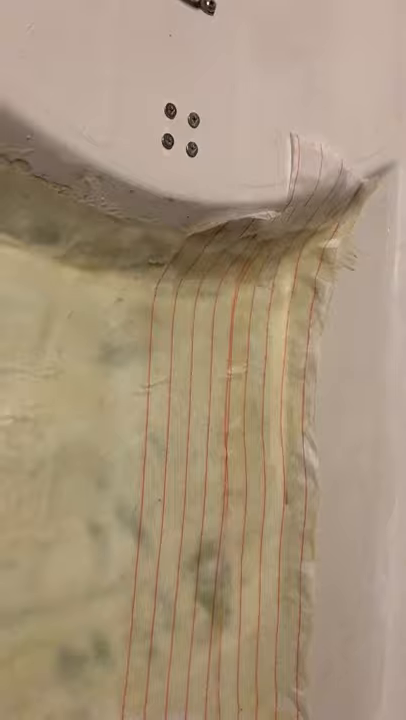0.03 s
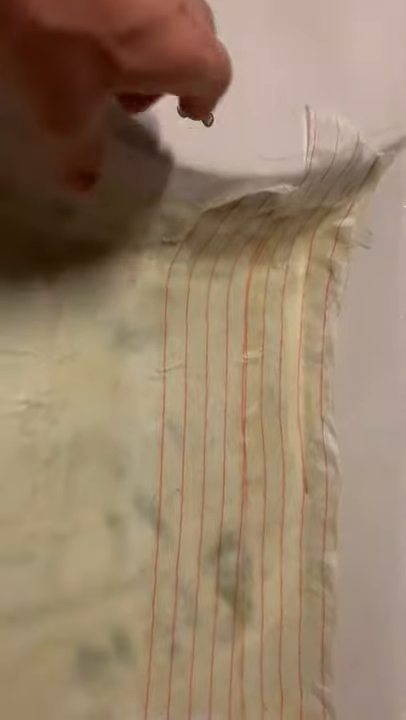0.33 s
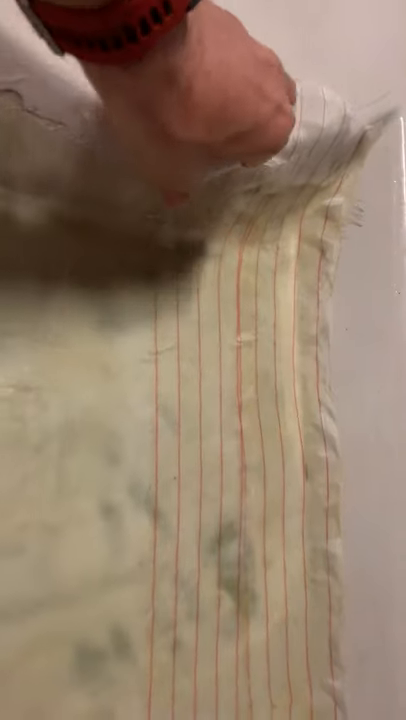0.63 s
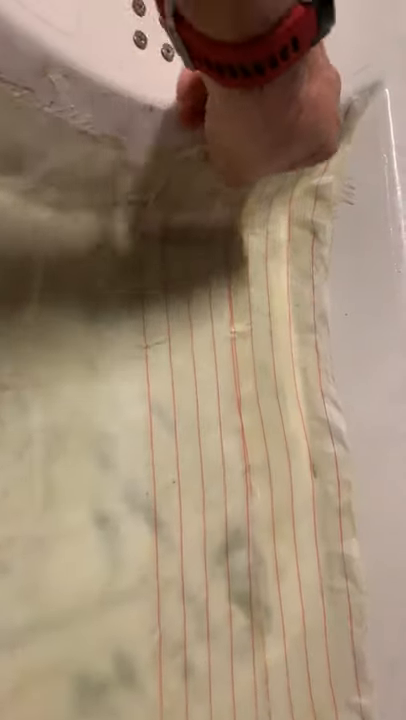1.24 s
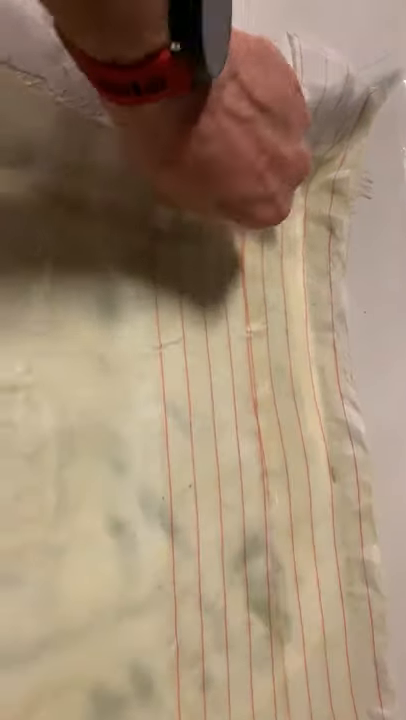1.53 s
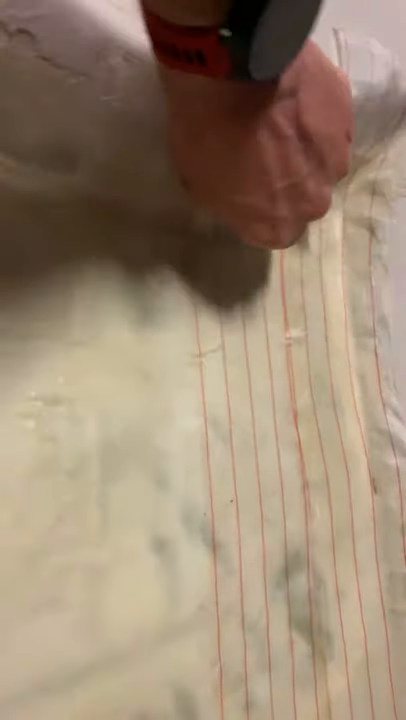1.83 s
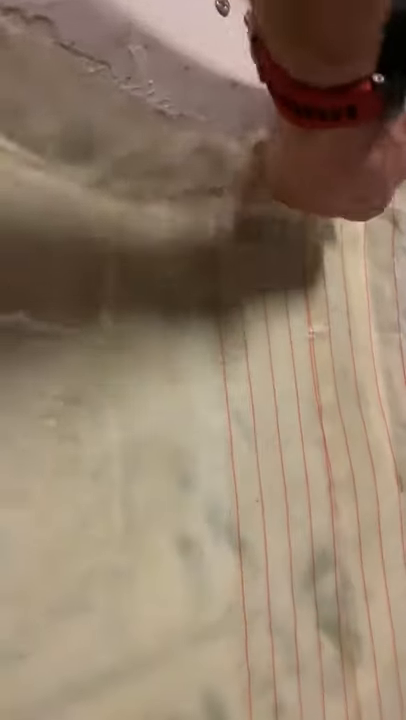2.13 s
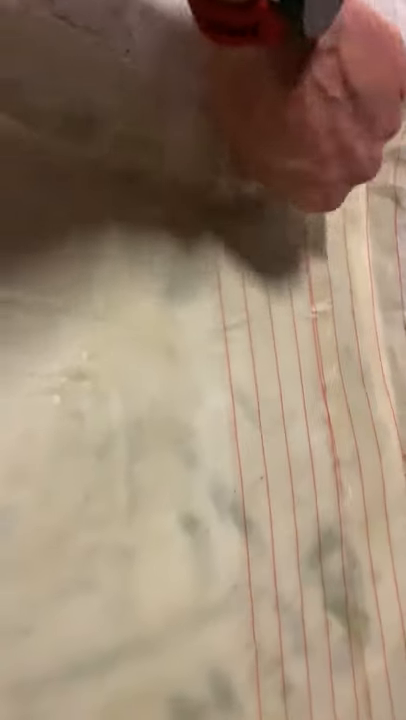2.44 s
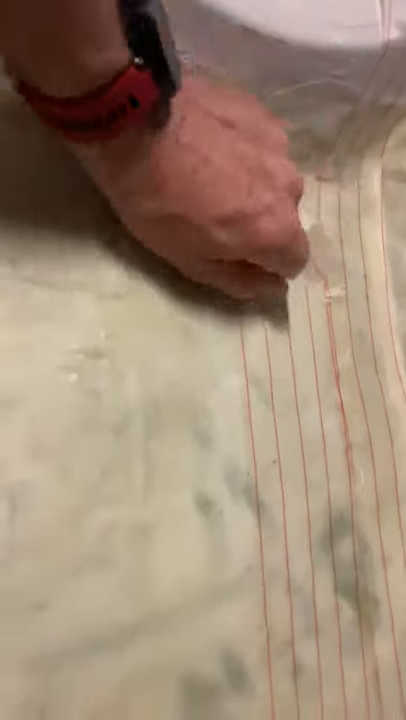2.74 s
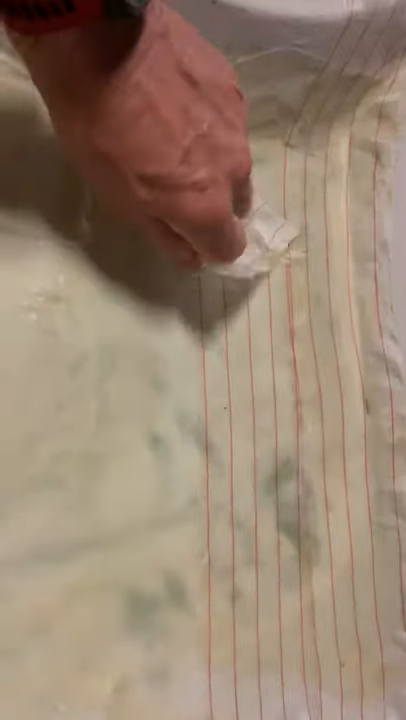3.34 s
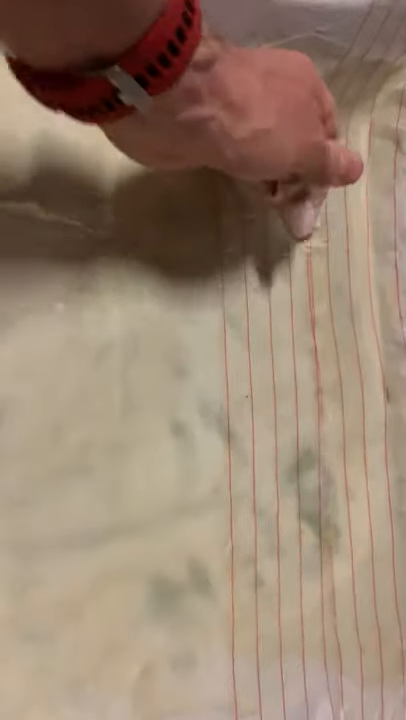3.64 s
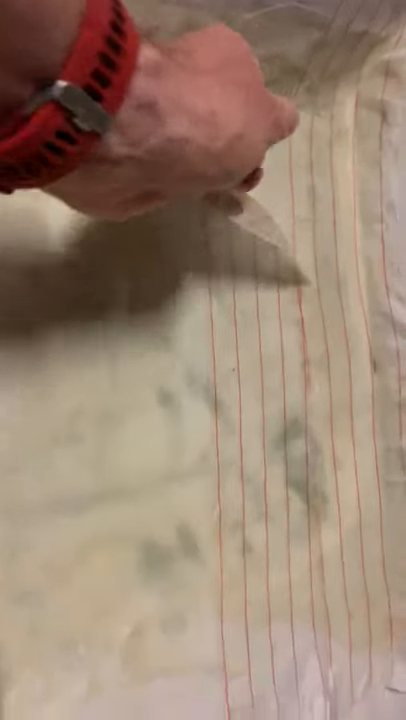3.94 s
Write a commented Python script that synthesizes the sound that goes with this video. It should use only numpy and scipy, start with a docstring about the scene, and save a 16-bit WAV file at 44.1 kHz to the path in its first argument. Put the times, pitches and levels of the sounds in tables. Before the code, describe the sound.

Dry cloth is torn off a hard resin panel by hand. Faint rustles grow into uneven, crackling rips and sharp snaps, with one low boom from the hull, heard close up in a boat cockpit.

```python
"""You hear faint rustles, then dry, crackling rips, sharp snaps and one low boom.
A hand is tearing peel ply (a strip of cloth) off a hardened resin panel in a boat cockpit.
Each pull breaks thousands of tiny resin bonds a second, so the cloth hisses and the panel rasps.
Bigger bonds snap one by one, the hull rumbles and booms, and the close walls add a short echo."""
import sys
import numpy as np
from scipy import signal
from scipy.fft import rfft, irfft
from scipy.io import wavfile
from scipy.ndimage import uniform_filter1d

SR = 44100
rng = np.random.default_rng(int(sys.argv[2]) if len(sys.argv) > 2 else 0)


def wav_record(signal):
    """Record a signal, one row per channel, as 16-bit PCM in the file named by sys.argv[1]."""
    frames = np.transpose(np.atleast_2d(signal))
    bounded = np.clip(frames, -1, 1)
    # unit amplitude maps onto the largest positive 16-bit level
    quanta = np.round(bounded * 32767).astype(np.int16)
    wavfile.write(sys.argv[1], SR, quanta)


N = 176400

# Levels in the tables are relative: the functions apply further gains.
# Tone of the still air and of the hull: frequency_hz, level_db
AIR_TONE = [(60, -19), (15000, -16)]
HULL_TONE = [(15, -15), (45, 0), (68, 1.5), (85, -3.5), (190, -9.5), (300, -15.5), (2000, -52)]
# The hull's rumble under the hand: time_s, level_db
RUMBLE_LEVELS = [(.09, -95), (.125, -64), (.5, -67), (.72, -49), (.86, -54), (1.02, -39.5), (1.24, -60),
                 (1.63, -30), (1.83, -44), (2.43, -44), (2.50, -22.5), (2.65, -33.5), (2.72, -16.5),
                 (2.83, -37), (3.2, -35.5), (3.6, -52.5), (3.72, -45), (4.0, -33.5)]
# Notes in the hull's boom: pitch_hz, level_db, fade_s (time to fall 60 dB)
BOOM_NOTES = [(63.9, 3, 0.44), (46.9, -7, 1), (199, -11.5, 0.064)]
# How long the cockpit echoes: frequency_hz, fade_s
ECHO_FADES = [(150, 0.38), (1000, 0.24), (15000, 0.21)]
# How far the left side is ahead of the right: frequency_hz, lead_radians
LEFT_LEAD = [(520, -.6), (900, .6), (3880, 1.7), (5300, 3.14), (8000, 6.2), (11200, 9.25), (12000, 9.6),
             (14300, 12.3)]
# Balance between the sides: frequency_hz, left_minus_right_db
LEFT_BALANCE = [(450, -2.5), (740, -6), (1220, -1), (5500, 0.5)]
# Tone of the cloth, the panel's corner and its flat part: frequency_hz, level_db
CLOTH_TONE = [(500, -25.5), (1500, -37), (2400, -7), (4800, 2.5), (6500, 6), (8500, 2.5), (14000, -2.5)]
CORNER_TONE = [(80, -36.5), (200, -2), (600, -2), (1600, -1), (3200, -11.5), (5000, -19.5), (12000, -56)]
FLAT_TONE = [(80, -35), (200, -1.5), (1000, 2.5), (1600, -1), (3200, -9), (5000, -17), (12000, -69)]
# Notes at which the panel rings: pitch_hz
PANEL_NOTES = [330, 405, 560, 955, 1185, 1580, 1800, 3150]
# Stiff flaps of cloth hitting the panel: start_s, pitch_hz, level_db
FLAP_HITS = [(.158, 1280, -55), (.984, 2200, -40.5), (.988, 930, -38), (1.665, 3230, -21),
             (3.077, 3230, -24.5), (3.652, 1014, -22), (3.7045, 1170, -22)]
# The fastest rip speeding up: time_s, pitch_hz, level_db
FAST_RIP = [(2.646, 1070, -17.5), (2.69, 1000, -22), (2.716, 1460, -31), (2.76, 1660, -13)]
# Single bonds letting go: start_s, crack_db, knock_db
BOND_SNAPS = [(1.35, -38.5, -44), (1.3614, -28.5, -36), (1.438, -23, -28.5), (1.445, -18, -22.5),
              (1.501, -26.5, -40), (1.5215, -24, -22.5), (1.5519, -18.5, -26.5), (1.5642, -13.5, -26),
              (1.5683, -18, -32), (1.5927, -23, -17), (1.6355, -16.5, -27), (1.6437, -19.5, -34),
              (1.6653, -30, -21.5), (1.687, -26.5, -21), (1.774, -25.5, -19.5), (2.387, -27, -20.5),
              (2.390, -16.5, -14.5), (2.4454, -14, -8), (2.4499, -17, -9), (2.457, -20, -17),
              (2.4627, -14.5, -6.5), (2.472, -13.5, -13), (2.4837, -15.5, -7.5), (2.506, -18.5, -33),
              (2.671, -29, -17), (2.7446, -36, -19.5), (2.7589, -13.5, -9), (2.7733, -21.5, -52),
              (3.036, -37, -18.5), (3.109, -25.5, -22), (3.183, -29.5, -9), (3.338, -32, -28),
              (3.4889, -35, -20.5), (3.5421, -27, -28), (3.645, -46, -20), (3.675, -26.5, -14.5),
              (3.784, -27, -34), (3.8402, -14, -45), (3.855, -25, -20), (3.8992, -15.5, -10),
              (3.98, -20, -14.5)]
# Loose cloth rustling in the hand: time_s, level_db
RUSTLE_LEVELS = [(.12, -85.5), (.62, -72.5), (1.26, -64.5), (1.72, -46.5), (1.89, -60.5), (2.1, -54),
                 (2.35, -53.5), (2.42, -46), (2.88, -46), (2.935, -59), (3.0, -52), (3.4, -50),
                 (3.61, -57.5)]
# Pulls, light and hard: start_s, end_s, hiss_start_db, hiss_end_db, rasp_start_db, rasp_end_db
HAND_PULLS = [(0.719, 0.874, -50, -62.5, -55, -63.5), (0.942, 0.991, -59, -44.5, -63.5, -44),
              (1.018, 1.09, -61, -79, -47.5, -72), (1.194, 1.223, -39, -58, -42.5, -64),
              (1.288, 1.426, -50, -56, -56, -54), (1.416, 1.59, -44, -35.5, -49.5, -33),
              (1.558, 1.693, -34, -44, -31.5, -38.5), (1.988, 2.069, -55.5, -40, -45.5, -45),
              (2.134, 2.192, -38.5, -34, -50, -45.5), (2.222, 2.329, -36.5, -49, -45, -47),
              (2.454, 2.493, -43, -21, -33, -20.5), (2.504, 2.646, -26.5, -30, -27, -27),
              (2.643, 2.653, -17.5, -16, -43, -40), (2.668, 2.706, -20, -26, -24.5, -22),
              (2.693, 2.755, -40, -23, -31, -29.5), (2.951, 3.106, -47, -49.5, -42.5, -42.5),
              (3.095, 3.151, -35.5, -23.5, -45.5, -22), (3.157, 3.173, -26.5, -25.5, -26, -21.5),
              (3.263, 3.333, -40.5, -38.5, -42.5, -36), (3.466, 3.499, -42.5, -35, -43.5, -33.5),
              (3.535, 3.579, -46, -44, -41.5, -58), (3.629, 3.679, -43, -34.5, -41.5, -25),
              (3.68, 3.756, -44, -41, -44, -38), (3.759, 3.884, -36.5, -32, -34.5, -28),
              (3.879, 3.998, -30.5, -43, -26.5, -35)]

NEW_GRIP_S = 2.9  # the peeling moves from the corner to the flat part
SNAP_DECAY_S = 0.0013
TIME_S = np.arange(N) / SR


def amp(db):
    """Turns decibels into a number to multiply by."""
    return 10 ** (np.asarray(db) / 20)


def evened(x):
    """Scales a sound to an average (rms) level of 1."""
    return x / np.sqrt(np.mean(x ** 2) + 1e-20)


def read(points, hz):
    """Looks up values between a table's rows, on a log-frequency scale."""
    row_hz, value = np.transpose(points)
    return np.interp(np.log(hz + 1), np.log(row_hz + 1), value)


def add(mix, start_s, sound):
    """Mixes a sound in at the given time."""
    part = mix[max(round(start_s * SR), 0):][:len(sound)]
    part += sound[:len(part)]


def colour(x, tone, size=4096):
    """Filters a sound to follow a tone table; white noise keeps its overall level."""
    log_gain = np.log(amp(read(tone, abs(np.fft.fftfreq(size, 1 / SR)))))
    response = np.exp(np.conj(signal.hilbert(log_gain)))  # rings after a hit, never before
    taps = np.fft.ifft(response).real[:size // 2]
    return signal.fftconvolve(x, taps / np.linalg.norm(taps))[:len(x)]


def resonate(x, hz, width_hz):
    """Makes a sound ring around a steady or moving pitch."""
    turn = np.exp(2j * np.pi * np.cumsum(hz * np.ones(len(x))) / SR)
    decay = np.exp(-np.pi * width_hz / SR)
    return 2 * (turn * signal.lfilter([1 - decay], [1, -decay], x / turn + 1e-18)).real


def air():
    """Still air: a very faint, steady hiss on each side."""
    return amp(-87) * np.array([evened(colour(noise, AIR_TONE)) for noise in rng.standard_normal((2, N))])


def hull(boom_s=2.68, rise_s=0.0041):
    """The hull rumbles as the hand tugs, and springs back with a boom when the strip gives way."""
    noise = evened(colour(rng.standard_normal(N), HULL_TONE, size=16384))
    out = amp(np.interp(TIME_S, *np.transpose(RUMBLE_LEVELS))) * noise
    boom = sum(amp(db - 60 * TIME_S / fade_s) * np.sin(2 * np.pi * hz * TIME_S)
               for hz, db, fade_s in BOOM_NOTES)
    add(out, boom_s, amp(-10) * np.minimum(TIME_S / rise_s, 1) * boom)
    return out


def cockpit_echo(x, gap_s=0.0027, spread=.66):
    """Sound bounces between hard, close walls and blurs into a short echo."""
    hz, t, spectrum = signal.stft(rng.standard_normal((3, SR)), SR, nperseg=256)
    fade = amp(-60 * t / read(ECHO_FADES, hz)[:, None])
    tail = signal.istft(spectrum * fade, SR, nperseg=256)[1]
    tail = (1 - spread) * tail[2] + spread * tail[:2]  # both sides share a part
    tail *= np.clip(np.arange(tail.shape[1]) / SR / gap_s - 1, 0, 1)  # a gap, then a fade in
    return signal.fftconvolve(x[None], tail / np.linalg.norm(tail[0]), axes=1)[:, :N]


def left_and_right(x, bass_hz=170, size=N + 4096):
    """The treble reaches the left side just before the right; the deep bass is not shifted."""
    hz = np.fft.rfftfreq(size, 1 / SR)
    apart = np.clip(hz / bass_hz - .5, 0, 1)
    left = amp(apart * read(LEFT_BALANCE, hz) / 2) * np.exp(.5j * apart * read(LEFT_LEAD, hz))
    return irfft(rfft(x, size) * np.array([left, 1 / left]), size)[:, :N]


def hand_cover(x, until_s=2.0, above_hz=10500, cover_db=-4.5):
    """At first the hand covers the tear and dulls the highest hiss."""
    dull = signal.sosfiltfilt(signal.butter(6, above_hz, fs=SR, output="sos"), x)
    return dull + (x - dull) * np.where(TIME_S < until_s, amp(cover_db), 1)


def panel(x, lag_s=0.001646):
    """The panel rings and bends. Low notes cross it more slowly, so each knock chirps downward."""
    ringing = x + amp(-7) * sum(resonate(x, hz, width_hz=81) for hz in PANEL_NOTES)
    size = len(x) + 8192
    hz = np.fft.rfftfreq(size, 1 / SR)
    lag_turns = 2000 * lag_s * np.sqrt(hz / 1000)
    head_start = np.exp(1j * np.pi * lag_s * hz)  # moves every note earlier by half of lag_s
    return irfft(rfft(ringing, size) * np.exp(-2j * np.pi * lag_turns) * head_start, size)[:len(x)]


def flaps(fade_s=0.029):
    """Stiff flaps of cloth flick the panel, each with a short, gritty ring."""
    t, out = np.arange(SR // 10) / SR, np.zeros(N)
    for start_s, hz, db in FLAP_HITS:
        grit = evened(resonate(rng.standard_normal(len(t)), hz, width_hz=hz))
        ring = np.sin(2 * np.pi * hz * t) + .5 * grit
        add(out, start_s, amp(db - 60 * t / fade_s) * ring)
    return out


def crackles(firm, per_s=190, lift=2.5):
    """Brief jumps in level where a firm pull tears out small bundles of threads."""
    starts = (rng.random(N) < per_s / SR) * rng.uniform(0.07, 1, N) * firm
    decay = np.exp(-1 / (2 * SNAP_DECAY_S * SR))
    return 1 + lift * signal.lfilter([1], [1, -decay], starts)


def fast_rip(width_hz=720):
    """Threads let go row by row like a zip: a rasp whose pitch rises with the speed."""
    times, hz, db = np.transpose(FAST_RIP)
    pitch = np.interp(TIME_S, times, hz)
    tearing = rng.standard_normal(N) * crackles(firm=True)
    note = resonate(resonate(tearing, pitch, width_hz), pitch, width_hz)
    level = np.interp(TIME_S, times, amp(db), left=0, right=0)
    return evened(note) * uniform_filter1d(level, size=128)


def snaps(rise_s=0.00015, thin_hz=815, size=1024):
    """A bundle of threads breaks free all at once: the cloth cracks and the panel knocks."""
    t = np.arange(size) / SR
    low_cut = signal.butter(2, thin_hz, "high", fs=SR, output="sos")
    cracks, knocks = np.zeros((2, N))
    for start_s, crack_db, knock_db in BOND_SNAPS:
        burst = rng.standard_normal(size) * (1 - np.exp(-t / rise_s)) * np.exp(-t / SNAP_DECAY_S)
        crack = colour(burst, CLOTH_TONE)
        if start_s < NEW_GRIP_S:  # the stiff corner carries few low notes
            knock = signal.sosfilt(low_cut, colour(burst, CORNER_TONE))
        else:
            knock = colour(burst, FLAT_TONE)
        add(cracks, start_s, amp(crack_db) * crack / np.linalg.norm(crack))
        add(knocks, start_s, amp(knock_db) * knock / np.linalg.norm(knock))
    return np.sqrt(.002 * SR) * (amp(3) * cracks + amp(-6) * panel(knocks))


def fractures(per_s=4500, catch_hz=165, spread_db=2):
    """Tiny resin bonds click as they break, louder and softer as the weave catches and slips."""
    hz = np.fft.rfftfreq(N, 1 / SR)
    catch_tone = (hz / catch_hz) ** .5 * np.exp(-hz / catch_hz)
    catch_db = evened(irfft(rfft(rng.standard_normal(N)) * catch_tone, N))
    sizes = amp(spread_db * np.minimum(rng.exponential(1, N), 4) + catch_db)
    return evened(sizes * rng.choice([-1., 1.], N) * (rng.random(N) < per_s / SR))


def pulls(rise_share=0.039, let_go_s=0.0076, firm_db=-44.5):
    """Each pull swells the stream of tiny breaks, heard as hiss in the cloth and rasp in the panel."""
    hiss_level = amp(np.interp(TIME_S, *np.transpose(RUSTLE_LEVELS)))
    rasp_level = hiss_level * amp(2)
    for start, end, hiss_start, hiss_end, rasp_start, rasp_end in HAND_PULLS:
        rise = np.clip((TIME_S - start) / (rise_share * abs(end - start) + 1e-9) + .5, 0, 1)
        stroke = rise * np.exp(-np.maximum(TIME_S - end, 0) / let_go_s)
        hiss_db = np.interp(TIME_S, [start, end], [hiss_start, hiss_end])
        rasp_db = np.interp(TIME_S, [start, end], [rasp_start, rasp_end])
        hiss_level = np.maximum(hiss_level, stroke * amp(hiss_db))
        rasp_level = np.maximum(rasp_level, stroke * amp(rasp_db))
    clicks = fractures() * crackles(firm=rasp_level > amp(firm_db))
    hiss = colour(clicks * hiss_level, CLOTH_TONE)
    taps = clicks * rasp_level
    rasp = np.where(TIME_S < NEW_GRIP_S, colour(taps, CORNER_TONE), colour(taps, FLAT_TONE))
    return amp(0.27) * hiss + amp(-6) * panel(rasp)


def scene():
    """The peeling and its echo, over the hull and the still air."""
    peel = hand_cover(pulls() + snaps()) + fast_rip() + flaps()
    return left_and_right(peel + hull() + amp(-9.5) * cockpit_echo(peel)) + air()


def record(dry, top_hz=15850):
    """Clips peaks at full scale, then removes the very highest treble."""
    high_cut = signal.firwin(511, top_hz, window=("kaiser", 9), fs=SR)
    return signal.oaconvolve(np.clip(dry, -1, 1), high_cut[None], "same")


dry = scene()
out = record(dry)
wav_record(out)
```